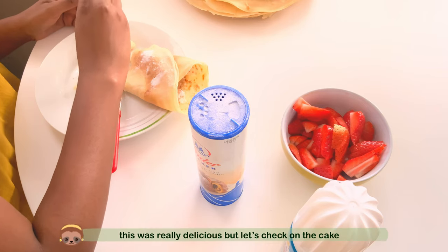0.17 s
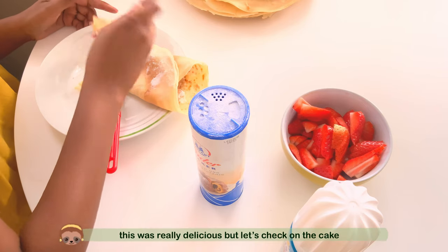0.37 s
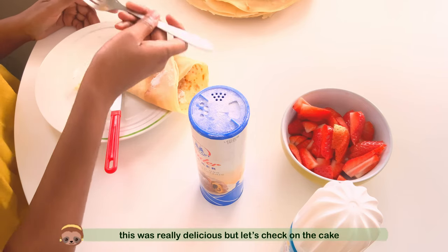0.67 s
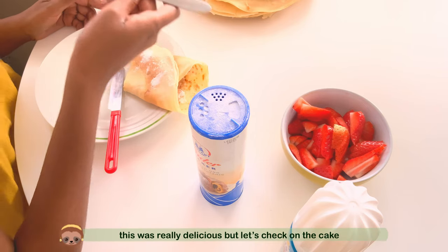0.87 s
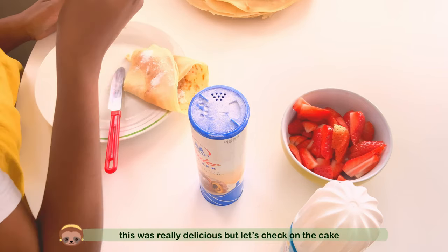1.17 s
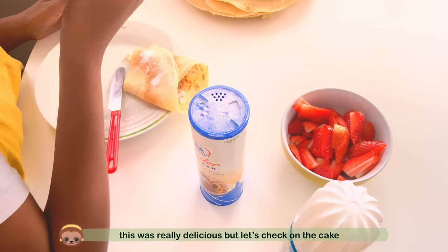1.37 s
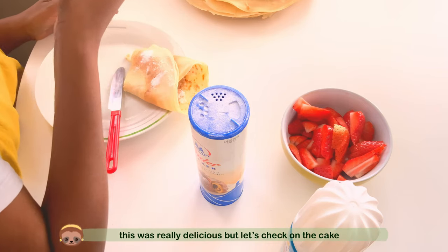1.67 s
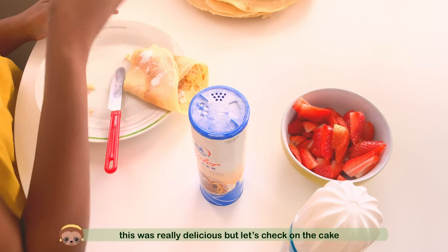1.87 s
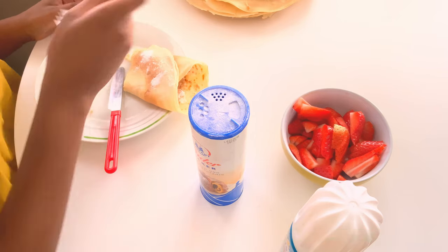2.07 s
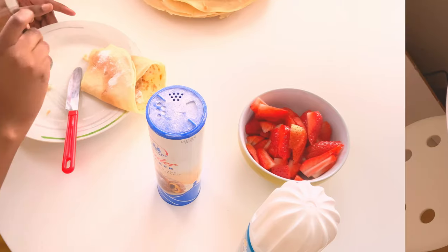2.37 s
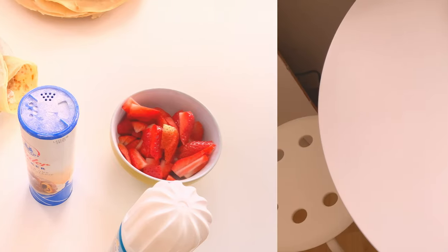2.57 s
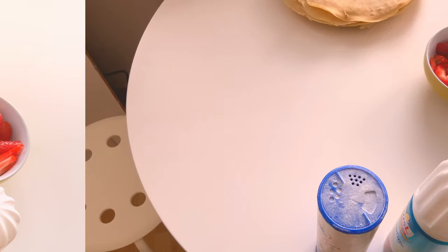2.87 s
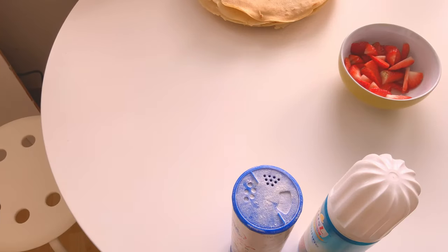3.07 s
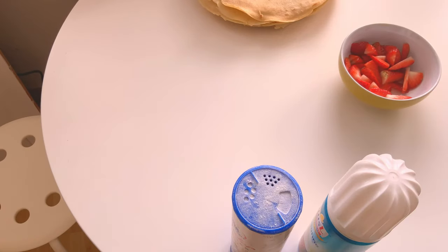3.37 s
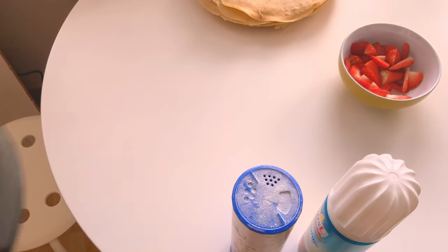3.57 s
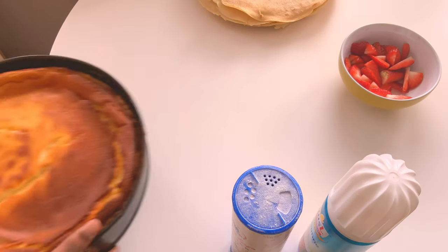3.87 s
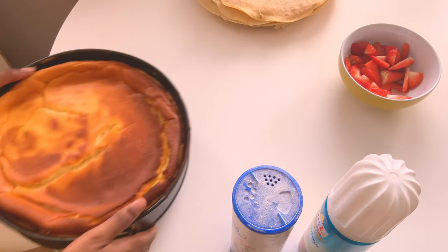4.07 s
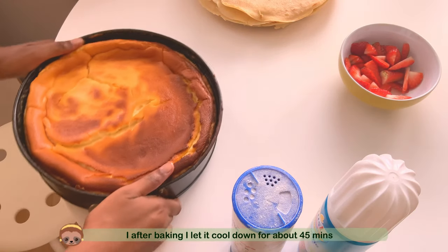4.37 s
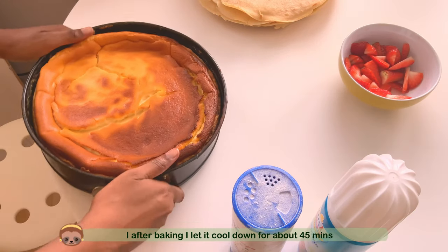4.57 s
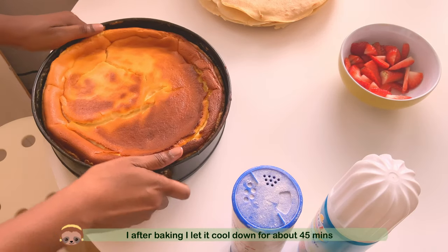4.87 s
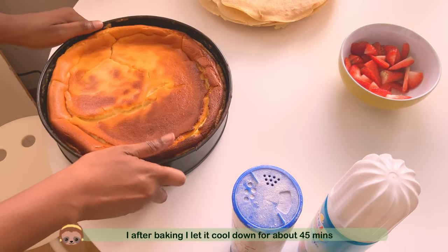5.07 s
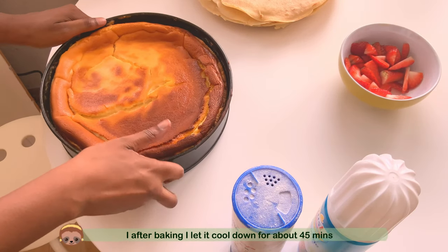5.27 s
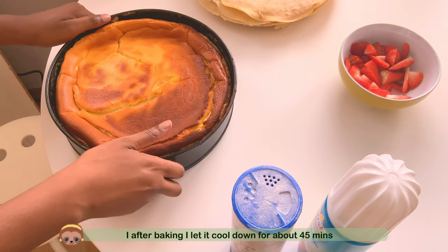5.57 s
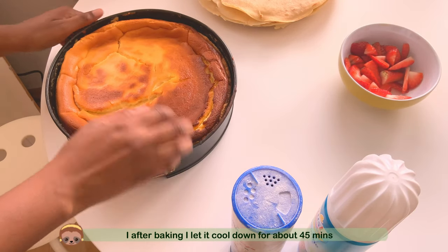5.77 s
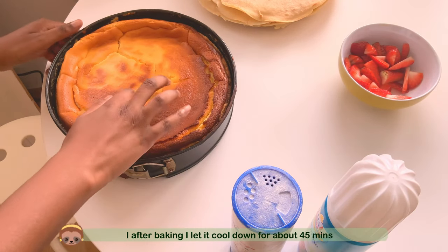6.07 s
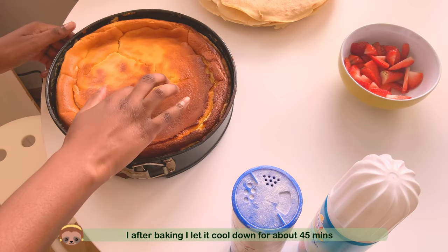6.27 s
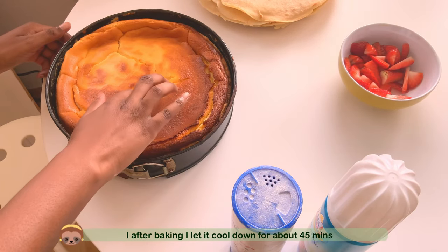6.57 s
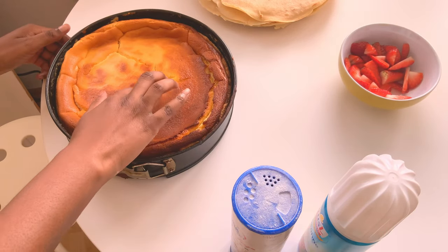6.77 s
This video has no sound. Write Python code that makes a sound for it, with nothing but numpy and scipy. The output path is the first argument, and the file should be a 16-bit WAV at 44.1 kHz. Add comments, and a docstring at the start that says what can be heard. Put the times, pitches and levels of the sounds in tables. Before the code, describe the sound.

A fork clinks on a plate, then a metal baking pan knocks down on a wooden table and is slid round.

```python
"""Baking pan on a kitchen table

A quiet kitchen, heard from a phone on a stand over the table. A fork ticks, scrapes and rings a plate,
and someone steps up in slippers, the floorboards booming under the weight. A full baking pan lands on
the wooden top, rocks and is slid round, its clasp rattling. The stand sways, and a low hum lies over
the microphone hiss."""
import sys
import numpy as np
from scipy import signal
from scipy.fft import rfft, irfft
from scipy.io import wavfile
from scipy.ndimage import uniform_filter1d

SR = 44100
rng = np.random.default_rng(int(sys.argv[2]) if len(sys.argv) > 2 else 0)


def int16_out(signal):
    """Quantize to a 16-bit WAV file."""
    q = np.round(np.clip(np.atleast_2d(signal).T, -1, 1) * 32767)
    wavfile.write(sys.argv[1], SR, q.astype(np.int16))


N = 305613


def undb(db):
    return 10 ** (np.asarray(db) / 20)


def unit(x):
    return x / np.sqrt(np.mean(x ** 2))


def band(x, hz, width_hz):
    """Two-pole resonance, gain 1 at the centre."""
    hz = min(hz, .45 * SR)
    return signal.lfilter(*signal.iirpeak(hz, max(hz / width_hz, .3), fs=SR), x)


def bands(x, peaks):
    """Parallel resonances of alternating sign."""
    return sum((-1) ** k * undb(db) * band(x, hz, width) for k, (hz, width, db) in enumerate(peaks))


def fade(t60, seconds):
    return np.exp(-np.log(1000) * np.arange(int(seconds * SR)) / SR / max(t60, .002))


def burst(t60, seconds=.1):
    return rng.standard_normal(int(seconds * SR)) * fade(t60, seconds)


def ring(modes, seconds):
    """Impulse response of a set of decaying modes."""
    t = np.arange(int(seconds * SR)) / SR
    return sum(undb(db) * fade(t60, seconds) * np.sin(2 * np.pi * hz * t) for hz, db, t60 in modes)


def add(out, s, sound, peak_db, echo_db=0):
    """Lay a sound at a time and peak level into the direct track and the track that feeds the echo."""
    i = int(s * SR)
    sound = sound[:N - i] * undb(peak_db) / np.abs(sound).max()
    out[:, i:i + len(sound)] += sound * undb([[0], [echo_db]])


def envelope(rows, column=1):
    """Gain along a column of timed dB points, silent outside them."""
    rows = np.array(rows, float)
    return undb(np.interp(np.arange(N) / SR, rows[:, 0], rows[:, column], -140, -140))


def walk(rate):
    """Random levels held 1 / rate s and slewed; spread 1."""
    hold = int(SR / rate)
    steps = np.repeat(rng.standard_normal(N // hold + 1), hold)
    return unit(uniform_filter1d(steps, hold)[:N])


def grit(floor, spike_share):
    """Noise with a random share of its samples spiking."""
    noise = rng.standard_normal(N)
    spikes = undb(2.5 * rng.exponential(size=N)) * (rng.random(N) < spike_share)
    return noise * (floor + spikes)


# The still kitchen at the microphone: (frequency [Hz], relative noise density [dB])
ROOM_SPECTRUM = [(26, -47.5), (45, -19), (59, -0.5), (80, 4), (93, -10), (102, -27), (137, -25.5),
                 (166, -29.5), (222, -26), (296, -25), (426, -28.5), (529, -28.5), (1020, -29.5),
                 (1430, -33.5), (14500, -41.5)]
ROOM_DB, HUM_DB = -63.5, -68

def room_tone():
    """Microphone hiss and room tone, with a wavering low hum."""
    hz = np.maximum(np.fft.rfftfreq(N, 1 / SR), 1)
    points_hz, points_db = np.array(ROOM_SPECTRUM).T
    colour = undb(np.interp(np.log(hz), np.log(points_hz), points_db))
    tone = unit(irfft(rfft(rng.standard_normal(N)) * colour, N)) * undb(0.23 * walk(1.7))
    hum = unit(band(rng.standard_normal(N), hz=72.7, width_hz=19.8))
    return undb(ROOM_DB) * tone + undb(HUM_DB) * hum


# Sway of the stand that holds the microphone: (time [s], level [dB])
STAND_SWAY = [(0, -69.5), (2.3, -75), (2.5, -63.5), (3.05, -49.5), (3.5, -63), (3.69, -41), (4.2, -46),
              (4.55, -55.5), (5.7, -54.5), (6.93, -68.5)]
SWAY_HZ, HEAVY_STEP_S = 8.7, 3.6
RUMBLE_DB, JOLT_RE_BOOM_DB = -69.5, -5

def stand():
    """The phone rocks at one slow rate; a rumble comes up the leg and swells after each floor boom."""
    t = np.arange(N) / SR
    sway = np.sqrt(2) * np.sin(2 * np.pi * SWAY_HZ * (t - HEAVY_STEP_S))
    rumble = unit(band(band(rng.standard_normal(N), 33, 22), 33, 22))
    jolt = (1 - fade(.05, 1)) * fade(0.18, 1)
    jolts = np.zeros((2, N))
    for s, db, *_ in FLOOR_BOOMS:
        add(jolts, s, jolt, db + JOLT_RE_BOOM_DB)
    return envelope(STAND_SWAY) * sway + (undb(RUMBLE_DB) + jolts[0]) * rumble


# Pan, elbow and heel on wood: (time [s], peak [dB], contact [ms], crack re peak [dB])
WOOD_BLOWS = [(0.2879, -46, 0.48, -20), (2.493, -46, 0.33, -35), (2.936, -51.5, .15, -27),
              (3.002, -56.5, .2, -30), (3.0856, -49.5, 0.13, -23), (3.511, -56, 0.53, -30),
              (3.578, -53, 0.22, -44), (3.689, -52, 0.25, -15), (4.4946, -9.5, 0.29, -22),
              (4.53, -24.5, 0.38, -38.5), (4.927, -23, 0.35, -27), (4.942, -22.5, 0.41, -23),
              (4.953, -38, 0.32, -34), (4.9786, -16, 0.28, -24.5), (5.207, -44.5, 0.45, -30),
              (5.229, -37.5, 0.46, -16), (5.2723, -31.5, 0.3, -18), (5.281, -31, 0.55, -34),
              (5.3863, -25, 0.36, -30), (5.494, -50.5, 0.26, -34), (5.539, -49.5, 0.28, -38.5)]
# The wooden top below the microphone: (frequency [Hz], relative level [dB], t60 [s])
TABLETOP_MODES = [(313, -11.5, 0.031), (390, -19.5, 0.046), (501, -2.5, 0.011), (554, -10, 0.034),
                  (631, -9.5, 0.045), (732, -4.5, 0.022), (920, -9, 0.021), (1116, -9, 0.033),
                  (1258, -7.5, 0.033), (1338, -8, 0.051), (1496, -12.5, .025), (1660, -6, 0.03),
                  (1880, -1, .02), (2083, -4, 0.026), (2414, -4.5, 0.022), (2620, -12.5, 0.0081),
                  (2910, -13, .015), (3220, -10.5, 0.013), (3500, -9.5, .012), (3850, -10.5, 0.016),
                  (4050, -13.5, .01), (4750, -18.5, 0.014)]
TABLE_EDGE_HZ = 333  # the top is too small to radiate below this
SPOT_DB = 2.5  # every blow lands elsewhere and wakes the modes unevenly
PAN_FROM_S, PAN_ECHO_DB, FAR_ECHO_DB = 4.4, -0.5, 4.9  # the pan is right under the phone: less echo

def knocks():
    """A rounded push, longer for softer contact, rings the table top; the hard rim adds a short crack."""
    out = np.zeros((2, N))
    low_cut = signal.butter(4, TABLE_EDGE_HZ, "high", fs=SR, output="sos")
    ms = np.arange(SR // 100) / SR * 1000
    spots = SPOT_DB * rng.standard_normal((len(WOOD_BLOWS), len(TABLETOP_MODES)))
    for (s, db, contact_ms, crack_db), spot in zip(WOOD_BLOWS, spots):
        echo_db = PAN_ECHO_DB if s > PAN_FROM_S else FAR_ECHO_DB
        modes = [(hz, level + shift, t60) for (hz, level, t60), shift in zip(TABLETOP_MODES, spot)]
        push = ms ** 3 * np.exp(-3 * ms / contact_ms)
        wood = signal.fftconvolve(ring(modes, .2), push)
        add(out, s, signal.sosfilt(low_cut, wood), db, echo_db)
        crack = band(band(burst(t60=0.019, seconds=.05), 3000, 4000), 3000, 4000)
        add(out, s, crack, db + crack_db, echo_db)
    return out


# Floorboards and table frame under the stand:
# (time [s], peak [dB], frequency [Hz], t60 [s], octave re fundamental [dB])
FLOOR_BOOMS = [(0.311, -48.5, 81.6, 0.25, -11.5), (0.379, -52.5, 78.5, 0.4, -20),
               (2.211, -61.5, 168.6, 0.059, -5.5), (2.503, -47.5, 77, 0.12, -1),
               (2.918, -44, 75.35, 0.9, -41), (3.577, -36.5, 81, 0.12, -23),
               (4.082, -43, 76.3, 0.33, -24.5), (4.493, -35, 54, 0.29, 0.5), (4.746, -48, 91, 0.17, -34),
               (4.932, -39.5, 49.3, 0.23, -7.5), (4.982, -33, 49.2, 0.215, -6.5),
               (5.282, -47, 52.8, 0.79, -7.5), (5.393, -47.5, 70.7, 0.34, -13.5)]

def floor_booms():
    """Weight comes onto the boards over a few hundredths of a second and they ring low."""
    out = np.zeros((2, N))
    rise = 1 - fade(0.044, 1)
    for s, db, hz, t60, octave_db in FLOOR_BOOMS:
        add(out, s, rise * ring([(hz, 0, t60), (2 * hz, octave_db, t60)], 1), db)
    return out[0]


# Cutlery, pan and joints around the table: (time [s], peak [dB], centre [Hz], width / centre [ratio])
SMALL_TICKS = [(0.319, -58, 3870, 0.87), (.508, -59, 6360, 0.65), (.675, -57, 3400, 0.83),
               (0.7076, -59, 2980, 0.94), (0.833, -60, 5600, 0.22), (1.192, -67.5, 3460, 0.22),
               (1.705, -60, 930, 0.78), (1.7215, -61, 10900, 0.48), (1.738, -62, 3480, 0.69),
               (1.876, -53, 960, 0.46), (1.88, -46, 1390, 0.47), (1.902, -70, 2340, .2),
               (2.0745, -61, 3430, 1.6), (2.155, -65, 1950, 0.79), (2.203, -57.5, 875, 0.74),
               (2.428, -59.5, 2120, 1.1), (2.655, -62.5, 1200, 0.97), (2.936, -54.5, 1760, 0.79),
               (3.024, -56, 2480, 0.58), (3.0839, -47, 1880, 0.84), (3.8122, -49, 1790, 1.13),
               (3.888, -54.5, 1750, 0.91), (4.388, -60, 2200, 0.57), (4.637, -55.5, 4500, 0.47),
               (4.828, -54, 3300, 0.8), (5.0425, -56.5, 4500, 0.63)]

def ticks():
    """Each tick is a burst of noise with its own colour; wider ticks die sooner."""
    out = np.zeros((2, N))
    for s, db, hz, width_ratio in SMALL_TICKS:
        width_hz = hz * width_ratio
        noise = burst(t60=.03 * (1000 / width_hz) ** .5)
        add(out, s, band(band(noise, hz, width_hz), hz, width_hz), db, echo_db=-4)
    return out


# Fork drawn over the plate, close to the microphone: (time [s], level [dB])
FORK_STROKE = [(1.868, -68), (1.88, -63.5), (1.892, -55), (1.903, -65), (1.915, -63), (1.938, -78)]
# What the tines ring: (centre [Hz], width [Hz], gain [dB])
FORK_RESONANCES = [(885, 64, -12), (1400, 193, -10), (2350, 110, -6), (3020, 500, -10.5), (4635, 55, -3.5),
                   (5600, 240, -12), (8200, 84, -13), (9460, 270, -11), (10260, 150, -10),
                   (11800, 250, -11), (12580, 200, -19), (13950, 300, -16)]
FORK_ECHO_DB = -11.5  # close up, so little echo

def fork_scrape():
    """The tines stick and slip on the plate in uneven clicks."""
    slips = grit(floor=.7, spike_share=.05)
    scrape = unit(bands(slips, FORK_RESONANCES) + undb(-21.5) * slips)
    return envelope(FORK_STROKE) * scrape * undb([[0], [FORK_ECHO_DB]])


# Fork striking the plate, just as close: (time [s], peak [dB])
FORK_CLINKS = [(2.4921, -34)]
# The plate's ring: (frequency [Hz], relative level [dB], t60 [s])
PLATE_MODES = [(1893, 14.5, 0.051), (1860, -7.5, 0.44), (2471, -12, 0.1), (4595, -1, 0.11),
               (5630, -5, 0.14), (5780, 10.5, 0.03), (6100, 4, 0.068), (6900, -4, 0.06), (7500, 5, 0.029),
               (8400, -16, 0.052), (9070, 5.5, 0.032), (10860, 0.5, 0.074), (12400, -30, .03),
               (14200, -21, .02)]

def fork_clink():
    """The fork hits with a bright crack and leaves the plate ringing."""
    out = np.zeros((2, N))
    for s, db in FORK_CLINKS:
        add(out, s, ring(PLATE_MODES, .4), db, FORK_ECHO_DB)
        crack = band(burst(t60=.014), hz=5400, width_hz=16000)
        add(out, s, crack, db - 9, FORK_ECHO_DB)
    return out


# Slippers and cloth coming up to the table: (peak time [s], hiss [dB], dull scuff [dB], fall time [s])
SLIPPER_SCUFFS = [(2.878, -69.5, -67.5, 0.073), (3.017, -70, -68, 0.11), (3.216, -77, -76.5, 0.25),
                  (3.54, -79.5, -76, 0.16), (3.705, -79.5, -78, 0.095), (3.838, -70, -69, 0.12),
                  (4.14, -66.5, -69, 0.12), (4.402, -76.5, -71.5, 0.36)]
# The pan sliding under the microphone, one list a slide: (time [s], hiss [dB], dull scuff [dB])
PAN_SLIDES = [
    [(4.60, -77, -71), (4.74, -65.5, -61.5), (4.80, -73.5, -66.5), (4.835, -67.5, -66.5),
     (4.88, -77.5, -71.5), (4.92, -65, -59)],
    [(5.04, -73, -65), (5.12, -71.5, -66), (5.18, -73, -68.5), (5.27, -57, -48), (5.31, -71, -70),
     (5.35, -58, -49.5), (5.38, -79, -82), (5.44, -70.5, -65), (5.56, -79, -72), (5.61, -92.5, -87)],
]
# Dull and bright colours of the friction: (centre [Hz], width [Hz], gain [dB])
SCUFF_BANDS = [(636, 1400, 4.5), (1770, 1800, 3.5)]
HISS_BANDS = [(3800, 7730, 6.5), (6830, 8800, -4.5)]
SCUFF_RISE = 0.36  # rise time over fall time

def rubbing():
    """Slippers, cloth and the sliding pan: grainy friction through upper and lower resonances."""
    friction = grit(floor=1, spike_share=.01)
    hiss = unit(bands(bands(friction, HISS_BANDS), HISS_BANDS)) * undb(1.5 * walk(70))
    scuff = unit(bands(friction, SCUFF_BANDS)) * undb(1.5 * walk(70))
    out = sum(envelope(slide, 1) * hiss + envelope(slide, 2) * scuff for slide in PAN_SLIDES)
    t = np.arange(N) / SR
    for s, hiss_db, scuff_db, fall_s in SLIPPER_SCUFFS:
        swell = np.exp(-np.maximum((t - s) / fall_s, (s - t) / (SCUFF_RISE * fall_s)) ** 2)
        out += swell * (undb(hiss_db) * hiss + undb(scuff_db) * scuff)
    return out


def phone_click(s=3.6336, peak_db=-36.5, width_ms=.055):
    """A single dry click in the phone itself: one narrow negative pulse."""
    ms = (np.arange(N) / SR - s) * 1000
    return -undb(peak_db) * np.exp(-(ms / width_ms) ** 2)


# Something hollow, off microphone: (frequency [Hz], relative level [dB], t60 [s])
HOLLOW_MODES = [(495, 3, 0.066), (560, 6, 0.055), (601, 11, 0.053), (690, 1, 0.07), (860, -19, .06)]

def hollow_tok(s=4.0806, peak_db=-43):
    """A bump rings the hollow body with a slightly rounded onset."""
    out = np.zeros((2, N))
    rise = 1 - fade(0.0015, .2)
    add(out, s, rise * ring(HOLLOW_MODES, .2), peak_db, FAR_ECHO_DB)
    return out


# The pan's clasp, close under the microphone: (time [s], peak [dB])
CLASP_RATTLES = [(5.224, -49), (5.229, -50.5), (5.252, -50), (5.259, -43), (5.272, -40.5), (5.278, -44),
                 (5.321, -47.5), (5.339, -44), (5.355, -57), (5.429, -52), (5.436, -57)]
# What the clasp rings: (centre [Hz], width [Hz], gain [dB])
CLASP_RESONANCES = [(2460, 220, 5.5), (3800, 580, -1), (5600, 700, 0.1), (8400, 700, -5),
                    (10100, 1400, -16), (11800, 1200, -18)]

def clasp():
    """Each rattle is a short burst of noise through the clasp's resonances."""
    out = np.zeros((2, N))
    for s, db in CLASP_RATTLES:
        noise = burst(t60=.028)
        add(out, s, bands(noise, CLASP_RESONANCES) + undb(-19.5) * noise, db, echo_db=-9)
    return out


# The kitchen walls, heard from over the table: (centre [Hz], t60 [s], relative level [dB])
ECHO_BANDS = [(290, 0.22, -12.5), (737, 0.27, -9.5), (1620, 0.3, -6.5), (2834, 0.22, 2.5),
              (6000, 0.073, -5.5), (11240, .15, -1)]
ECHO_GAIN_DB, FIRST_WALL_MS = -37.5, 0.9

def kitchen_echo(direct, sent):
    """The direct sound plus a diffuse echo that starts at the first wall and dies sooner in the treble."""
    ms = np.arange(int(.6 * SR)) / SR * 1000
    tail = sum(undb(db) * fade(t60, .6) * unit(band(rng.standard_normal(len(ms)), hz, hz))
               for hz, t60, db in ECHO_BANDS)
    onset = 1 - np.exp(-(ms / FIRST_WALL_MS) ** 2)
    return direct + undb(ECHO_GAIN_DB) * signal.fftconvolve(sent, tail * onset)[:N]


def scene():
    """Mono, from over the table; the click, booms, stand and room tone get no echo."""
    sources = knocks() + ticks() + clasp() + hollow_tok() + fork_clink() + fork_scrape() + rubbing()
    return (kitchen_echo(*sources) + phone_click() + floor_booms() + stand() + room_tone())[None]


def record(dry):
    """The phone cuts the treble steeply above 14.6 kHz."""
    return signal.sosfilt(signal.ellip(8, .2, 60, 14600, fs=SR, output="sos"), dry)


dry = scene()
out = record(dry)
int16_out(out)
```